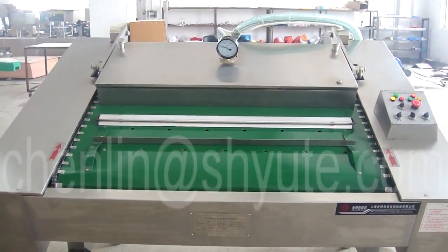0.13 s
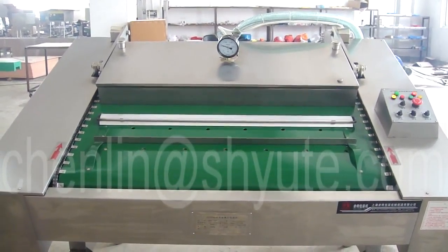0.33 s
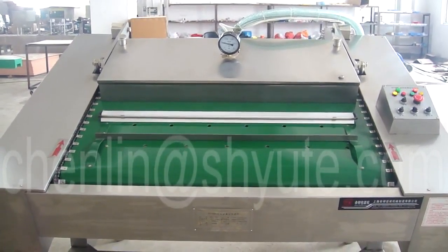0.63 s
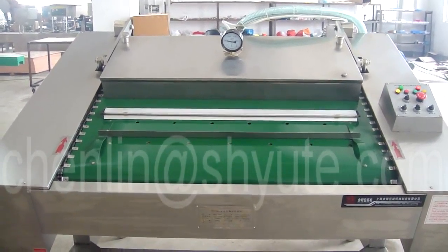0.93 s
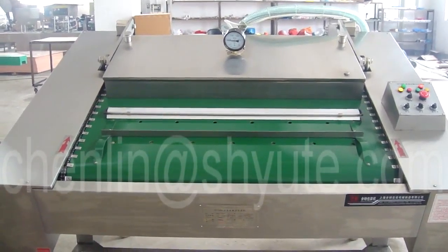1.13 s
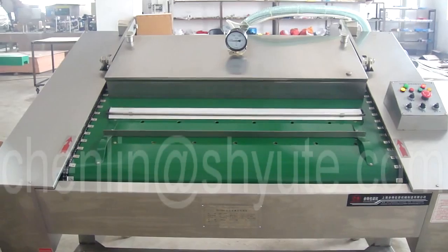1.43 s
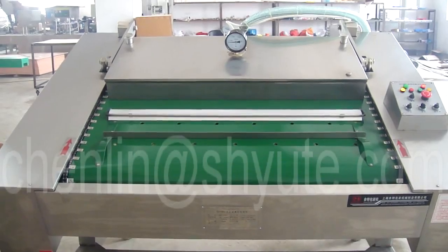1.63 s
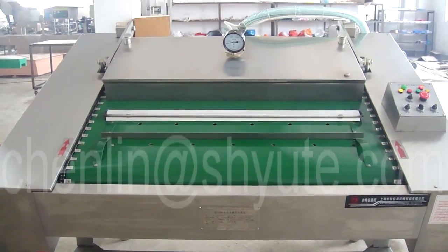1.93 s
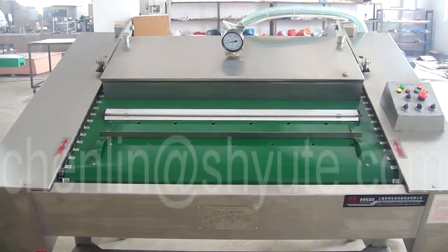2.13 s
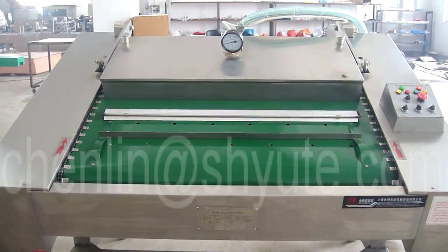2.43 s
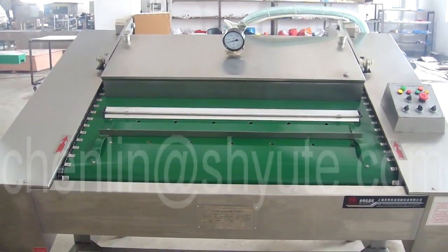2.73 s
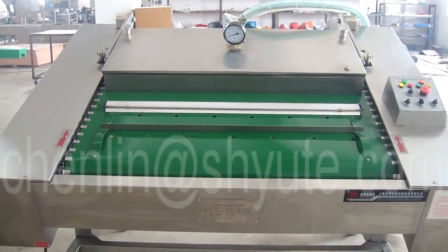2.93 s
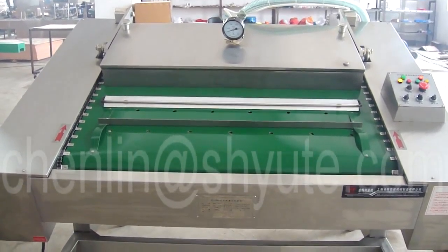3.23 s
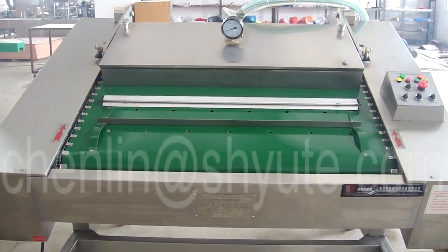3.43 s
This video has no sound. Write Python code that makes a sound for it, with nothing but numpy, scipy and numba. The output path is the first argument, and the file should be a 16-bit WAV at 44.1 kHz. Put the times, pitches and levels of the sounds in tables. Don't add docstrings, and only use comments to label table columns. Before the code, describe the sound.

A vacuum packing machine drones throughout in a reverberant workshop: piston pump throbbing about eleven times a second, gears whining, cooling air rushing, low rumble swelling and ebbing. Faint leak and thin squeals early on. At 2.0 s a bright, whistling hiss of air bursts out, the microphone level dipping; a short slap at 2.35 s. The hiss fades by about 3 s; drone and faint high squeals continue to 3.6 s.

```python
import sys
import numpy as np
from scipy import signal
from scipy.fft import rfft, irfft
from scipy.io import wavfile
from scipy.ndimage import uniform_filter1d
from numba import njit

SR = 44100
rng = np.random.default_rng(int(sys.argv[2]) if len(sys.argv) > 2 else 0)


def how_loud(loudness_db):
    steps = np.asarray(loudness_db, float) / 20
    return 10 ** steps


def pcm_store(signal):
    levels = np.round(np.clip(np.atleast_2d(signal), -1, 1) * 32767)
    wavfile.write(sys.argv[1], SR, levels.astype(np.int16).T)


N = 158319
T = np.arange(N) / SR


def curve(rows, col=1):
    rows = np.array(rows, float)
    return np.interp(T, rows[:, 0], rows[:, col])


def unit(x):
    return x / np.sqrt(np.mean(x ** 2))


def shape(hz, points):
    p = np.array(points, float)
    return how_loud(np.interp(np.log(hz + 1), np.log(p[:, 0]), p[:, 1]))


def ring(x, hz, width):
    return signal.lfilter(*signal.iirpeak(hz, hz / max(width, 1), SR), x)


def band(x, hz, width):
    return ring(ring(x, hz, 1.3 * width), hz, 1.3 * width)


def walk(rate):
    k = int(SR / rate)
    steps = np.repeat(rng.standard_normal(N // k + 1), k)
    return unit(uniform_filter1d(uniform_filter1d(steps, k), k)[:N])


def tone(hz, start=0):
    return np.sqrt(2) * np.sin(2 * np.pi * (np.cumsum(hz) / SR + start))


def rush(points, swell_db, flicker_db):
    f = np.fft.rfftfreq(N, 1 / SR)
    noise = rfft(rng.standard_normal(N)) * shape(f, points)
    swelling = swell_db * walk(2.15)
    out = 0
    for octave in np.arange(11, 29) / 2:
        weight = np.clip(1 - 2 * abs(np.log2(f + 1) - octave), 0, 1)
        out = out + irfft(noise * weight, N) * how_loud(swelling + flicker_db * walk(9.024))
    return unit(out)


def echo(x, t60):
    t = T[:SR]
    tail = rng.standard_normal(SR) * np.exp(-np.log(1000) * t / t60)
    return signal.fftconvolve(x, tail / np.sqrt(np.sum(tail ** 2)))[:N]


def burst(start, length):
    return np.sin(np.pi * np.clip((T - start) / length, 0, 1))


def shop():
    # f/Hz, level/dB per Hz
    rumble = [(50, -21), (100, -11), (170, -3), (260, 1), (320, 1.5), (400, -8), (600, -41.5)]
    # t/s, level/dB
    swell = [(0, -24), (.15, -26), (.5, -29.5), (.95, -35.5), (1.2, -33), (1.75, -30.5), (2.0, -28),
             (2.12, -33), (2.3, -29.5), (2.7, -26.5), (3.2, -22), (3.59, -23)]
    # f/Hz, pitch wander/Hz, level/dB
    casing_tones = [(257.4, 1.28, -4.5), (249.5, 1.24, -16.5), (266.6, 1.64, -13), (306.2, 1.46, -9),
                    (314, 1.12, -12), (318.4, 1.5, -9.5), (357.3, 1.2, -13), (282.6, 1.494, -9.5)]
    hum = 0
    for hz, wander_hz, db in casing_tones:
        hum = hum + how_loud(db + 2 * walk(3.06)) * tone(hz + wander_hz * walk(6))
    return how_loud(curve(swell)) * (rush(rumble, 0.35, 1.74) + hum)


def squeaks():
    # start/s, length/s, level/dB, f/Hz, width/Hz
    leaks = [
        (.3, .34, -40, 6500, 9000),
        (1.86, .32, -37, 7500, 8000),
    ]
    # start/s, length/s, f/Hz, width/Hz, level/dB
    squeals = [
        (.5, 1.15, 3867, 25, -44),
        (.3, 1.5, 3830, 150, -41),
        (2.95, 1.1, 5290, 200, -41),
        (3.25, .5, 5300, 110, -40),
        (3.15, .7, 10280, 90, -52),
        (3.2, .6, 9660, 20, -59),
        (3.2, .7, 7800, 60, -58),
        (-.1, .5, 9620, 150, -58),
        (2.15, .3, 5350, 250, -48),
    ]
    out = 0
    for start, length, db, hz, width in leaks:
        out = out + how_loud(db) * burst(start, length) * unit(ring(rng.standard_normal(N), hz, width))
    for start, length, hz, width, db in squeals:
        squeal = unit(band(rng.standard_normal(N), hz, width))
        out = out + how_loud(db + walk(13.2)) * burst(start, length) * squeal
    return out


def cooling_air():
    # f/Hz, level/dB per Hz
    air = [(45, -40), (130, -25), (420, -4.5), (680, -1), (1300, -3), (2500, -6), (4200, -13),
           (11000, -31.5)]
    return how_loud(-22.5) * rush(air, 0.19, 0.84)


def motor():
    # f/Hz, rms level at first/dB, rms level at last/dB
    hum = [(762, -47, -46), (811, -42, -45), (836, -46, -48), (861, -38, -43), (889.6, -30, -37),
           (911, -44, -46), (939.6, -36, -31), (960, -47, -48), (968.6, -38, -37), (1018, -46, -46),
           (1091, -39, -42), (1118, -38, -41)]
    wander_db, wander_hz = 2.4, 0.5
    out = 0
    for hz, first, last in hum:
        level_db = first + (last - first) * T / T[-1] + wander_db * walk(2.53)
        out = out + how_loud(level_db) * tone(hz + wander_hz * walk(4.37), rng.random())
    return out


def pump():
    # t/s, thump level/dB, whine and rattle level/dB
    effort = [
        (0, -45, 0.5),
        (.4, -38.5, 2.5),
        (.8, -47, 3),
        (1.4, -50.5, 1),
        (1.6, -38, -1),
        (2.2, -43.5, -4),
        (2.9, -34, -5.5),
        (3.59, -38, 1.5),
    ]
    # f/Hz, rms level/dB
    whine_tones = [(522.6, -33), (533.7, -37), (544.8, -41), (555.9, -46), (622.5, -41), (633.6, -41),
                   (1145, -39), (1156, -34), (1167, -38), (1178, -39), (1189, -44)]
    # f/Hz, width/Hz, level/dB
    modes = [(552.3, 64, -30.5), (619, 20, -34), (1164.6, 40, -26.5), (916, 127, -30), (1717, 210, -30.5)]
    stroke_hz, first_turn, jitter, scatter_db = 11.15, 0.32, 0.00033, 0.6
    thump_hz, thump_width_hz = 88, 13
    creep_per_s, whine_wander, whine_wander_db = 0.0022, 0.001165, 3
    rattle_db, rattle_share = -4, 0.77

    turns = first_turn + np.cumsum(stroke_hz * (1 + jitter * walk(6))) / SR
    count = turns.astype(int)
    force = how_loud(scatter_db * rng.standard_normal(60))[count]
    blows = np.diff(count, prepend=0) * force
    thump = unit(band(blows, thump_hz, thump_width_hz))

    speed = 1 + creep_per_s * T + whine_wander * walk(5.01)
    whine = 0
    for hz, db in whine_tones:
        whine = whine + how_loud(db + whine_wander_db * walk(2.93)) * tone(hz * speed, rng.random())

    rattle = rng.standard_normal(N) * np.exp(-((turns + 0.2) % 1) / rattle_share)
    casing = sum(how_loud(db + rattle_db) * unit(band(rattle, hz, width)) for hz, width, db in modes)
    return thump * how_loud(curve(effort)) + (whine + casing) * how_loud(curve(effort, col=2))


def valve():
    # t/s, level/dB
    flow = [
        (1.98, -57),
        (2.006, -27),
        (2.018, -19.5),
        (2.1, -21),
        (2.45, -22.5),
        (2.6, -24.5),
        (2.75, -31),
        (2.95, -41),
        (3.15, -50),
    ]
    # f/Hz, level/dB per Hz
    jet = [(2500, -22), (5200, -12.5), (6330, -11.5), (6480, -7.5), (6760, -1), (7000, -4), (9200, -12.5),
           (11000, -15.5)]
    # f/Hz, width/Hz, level/dB
    muffler = [(6481, 25, -2), (6549, 25, -4), (6690, 70, -5), (6729, 20, 0), (7000, 25, -5),
               (7155, 20, -3), (7320, 25, -7), (7780, 35, -6), (8410, 26, -8), (8800, 90, -12),
               (9140, 25, -9), (9460, 30, -11), (9940, 38, -13), (10200, 33, -13)]
    # t/s, level/dB, decay/s, f/Hz
    slap = (2.35, -20, 0.03, 900)
    muffler_db, walls_db, walls_t60_s = -5, -7, 0.15

    raw = rng.standard_normal(N)
    whistle = sum(how_loud(db) * unit(band(raw, hz, width)) * np.sqrt(width) for hz, width, db in muffler)
    hiss = rush(jet, 0.2, 0.43) + how_loud(muffler_db) * unit(whistle)
    hiss = hiss * how_loud(curve(flow)) * (T > flow[0][0])

    start, db, decay, hz = slap
    fade = np.exp(-np.clip(T - start, 0, 9) / decay) * (T > start)
    near = hiss + how_loud(db) * unit(ring(raw, hz, 2 * hz)) * fade
    return near + how_loud(walls_db) * echo(near, walls_t60_s)


def scene():
    # t/s, level/dB
    load = [(0, -1.5), (.5, 1.5), (.85, 1), (1.05, 1.5), (1.3, 1.5), (1.65, 0), (1.9, 1), (2.03, 3.5),
            (2.08, -2), (2.7, 0), (3.3, 1.5), (3.59, 1.5)]
    hall_db, hall_t60_s = -7, 0.7
    load_db = curve(load)
    machine = how_loud(load_db) * cooling_air() + how_loud(load_db / 2) * motor() + pump()
    near = squeaks() + valve()
    return (shop() + machine + near + how_loud(hall_db) * echo(near, hall_t60_s))[None]


@njit
def follow(x, rise, fall):
    y, e = np.empty(len(x)), 0.
    for i in range(len(x)):
        e += (x[i] - e) * (rise if x[i] > e else fall)
        y[i] = e
    return y


def top_cut(x):
    return signal.sosfilt(signal.butter(12, 15570, fs=SR, output="sos"), x)


def record(dry):
    # f/Hz, level/dB
    mirror = [(12900, -12), (13500, -15), (14300, -26), (15100, -35)]
    duck_db, full_duck_db, attack_s, release_s = -5, -29, 0.025, 0.4
    band_top_hz, converter_hz = 11010, 24000

    treble = signal.sosfilt(signal.butter(2, 5000, "high", fs=SR, output="sos"), dry[0])
    treble_rms = np.sqrt(uniform_filter1d(treble ** 2, size=441) + 1e-12)
    loud = np.clip(treble_rms / how_loud(full_duck_db), 0, 1)
    x = dry[0] * how_loud(duck_db * follow(loud, 1 / (attack_s * SR), 1 / (release_s * SR)))

    f = np.fft.rfftfreq(N, 1 / SR)
    x = irfft(rfft(x) * np.clip((band_top_hz + 60 - f) / 120, 0, 1) ** 2, N)
    top = irfft(rfft(x) * (f > 8500), N)
    folded = 2 * top * np.cos(2 * np.pi * converter_hz * T)
    image = rfft(folded) * (f > 12500) * (f < 15200)
    x = x + irfft(image * shape(f, mirror), N)
    return top_cut(x[None])


dry = scene()
out = record(dry)
pcm_store(out)
```